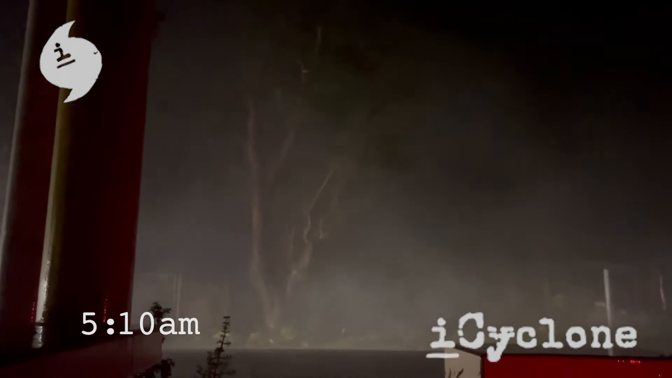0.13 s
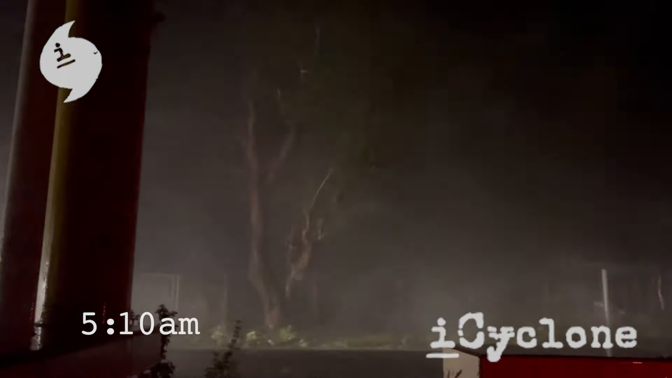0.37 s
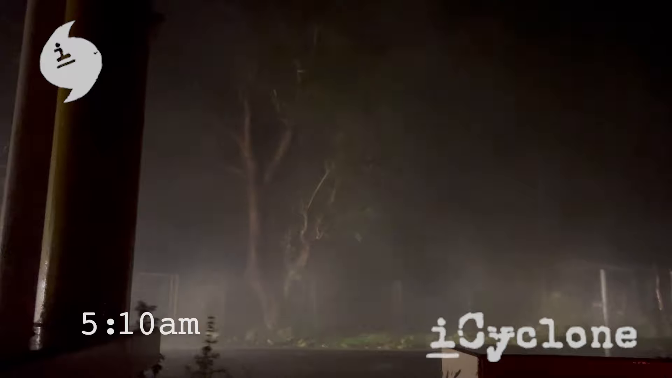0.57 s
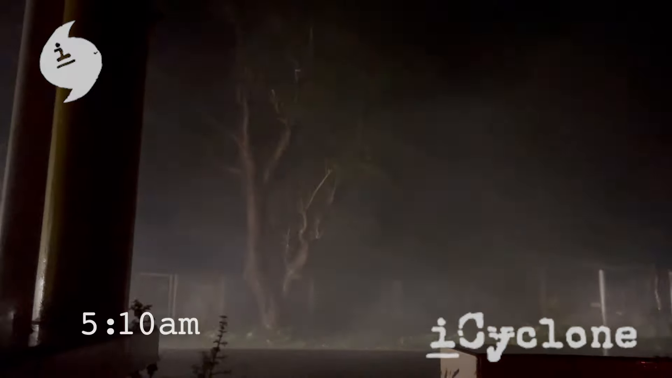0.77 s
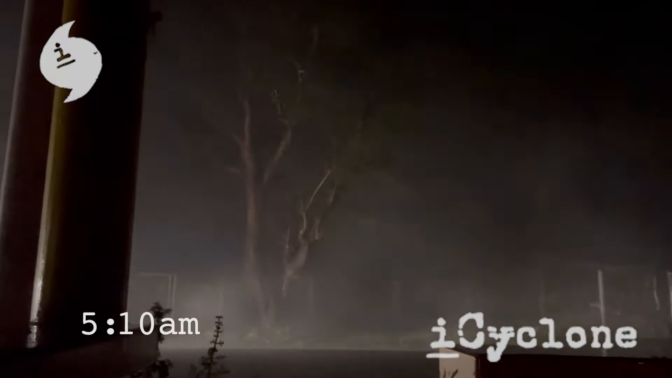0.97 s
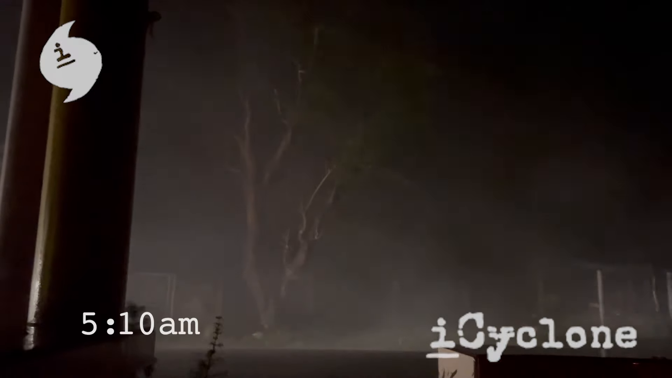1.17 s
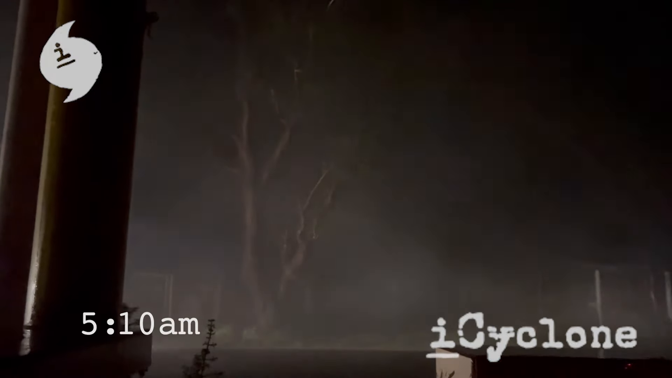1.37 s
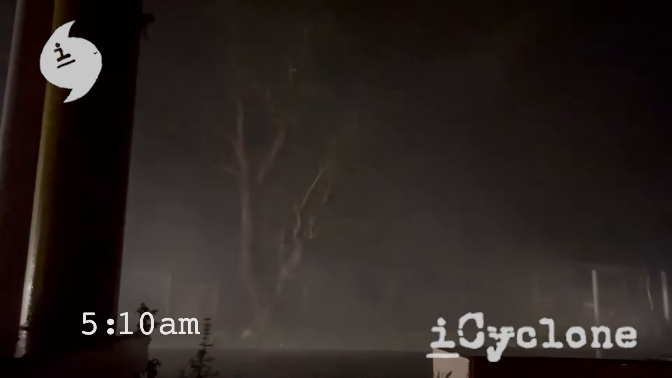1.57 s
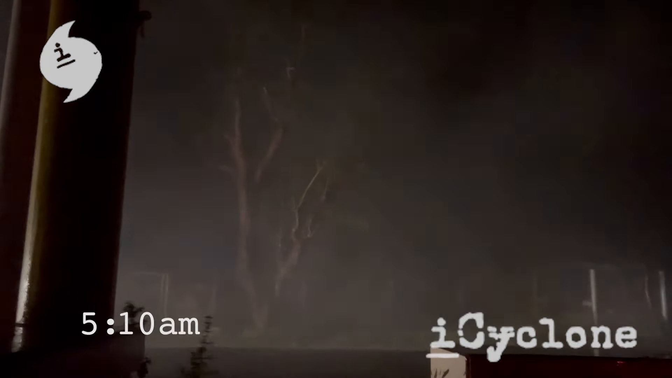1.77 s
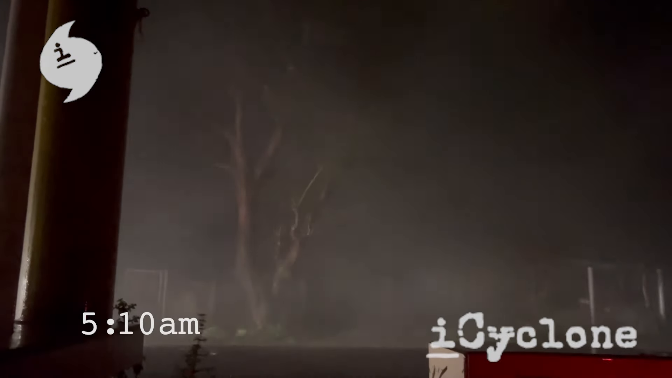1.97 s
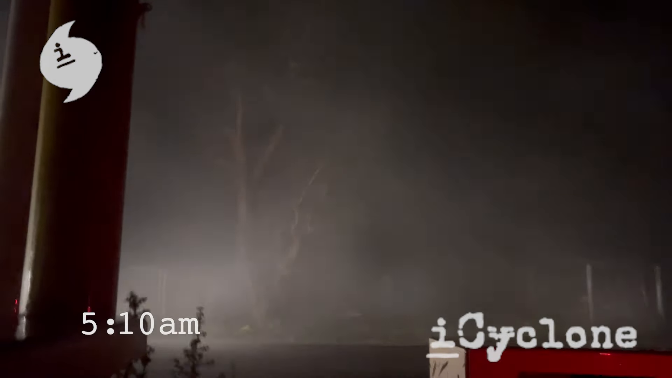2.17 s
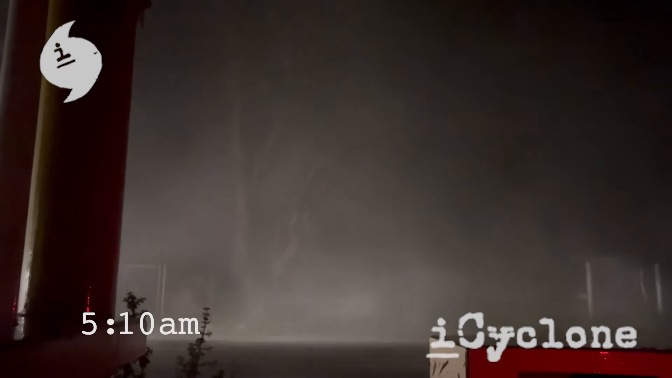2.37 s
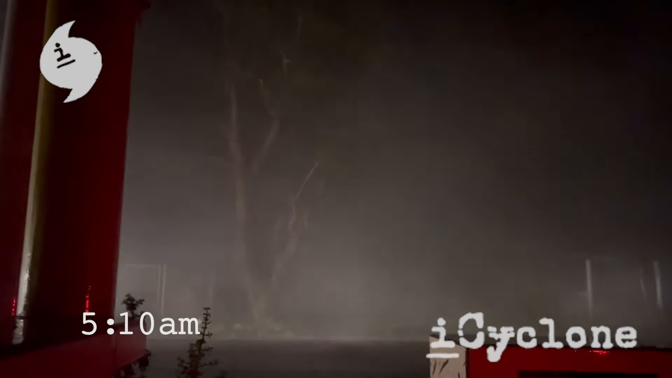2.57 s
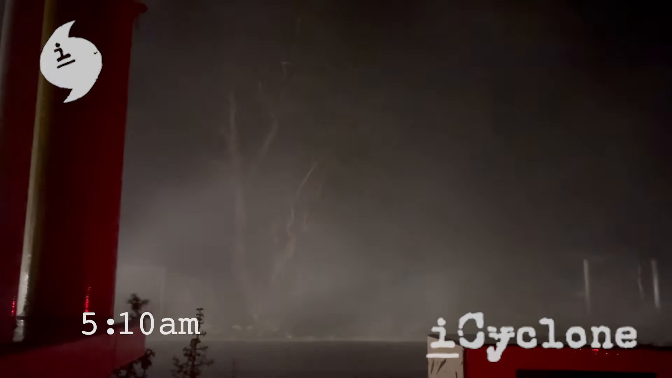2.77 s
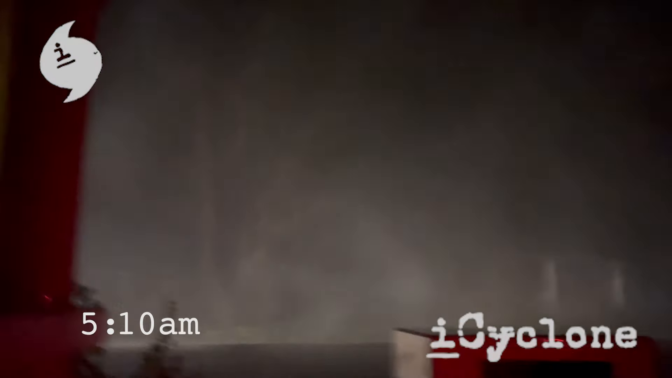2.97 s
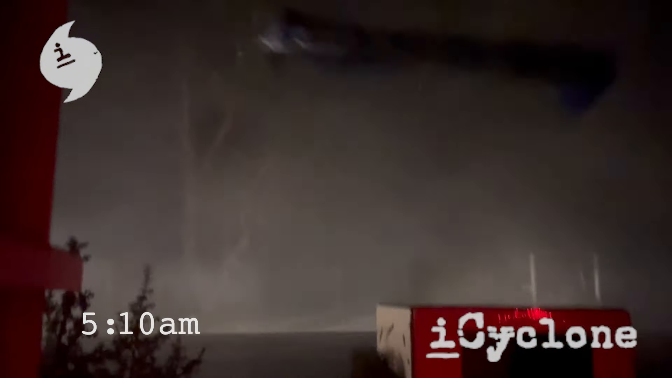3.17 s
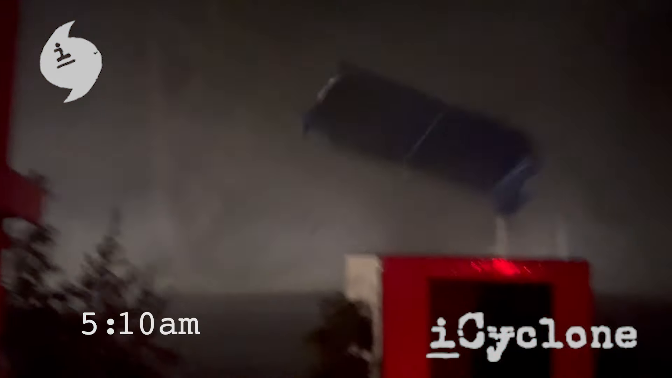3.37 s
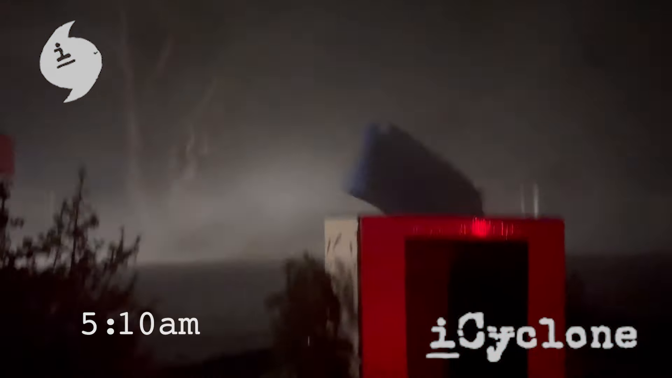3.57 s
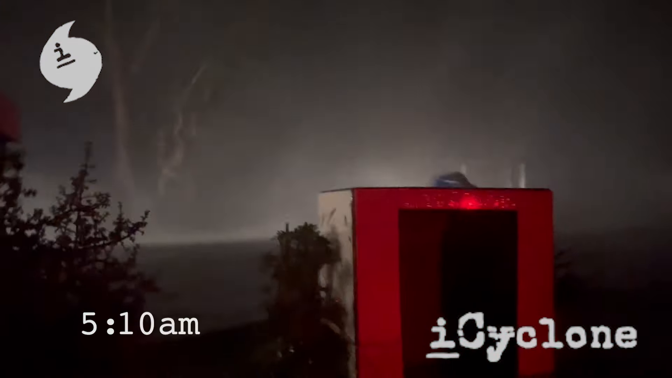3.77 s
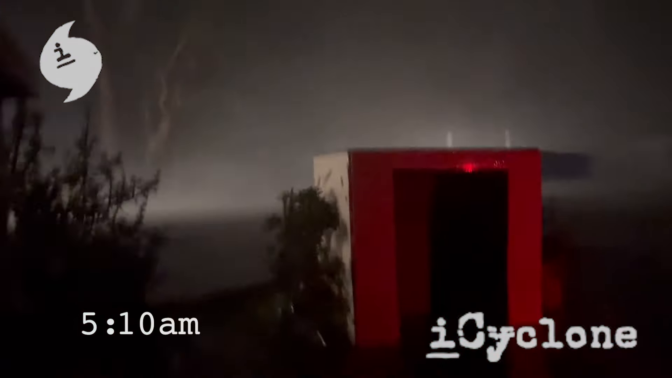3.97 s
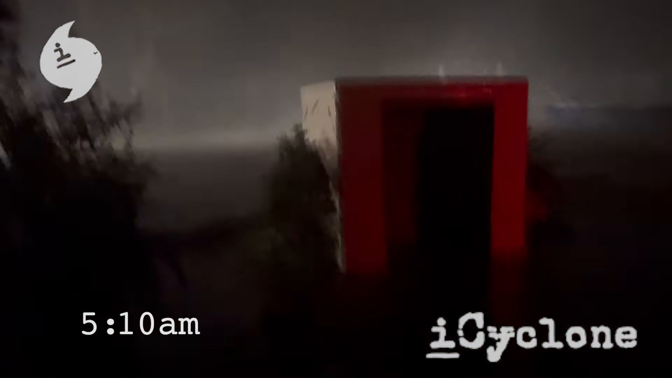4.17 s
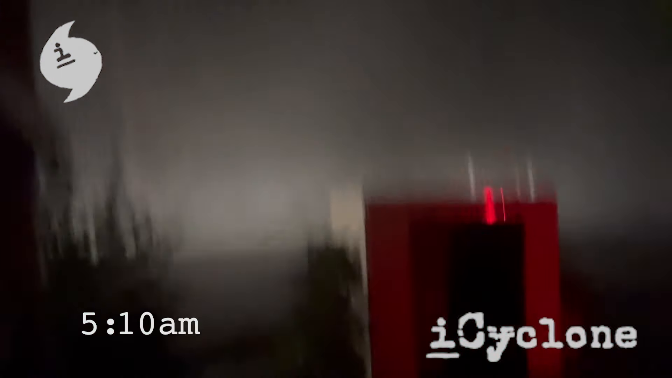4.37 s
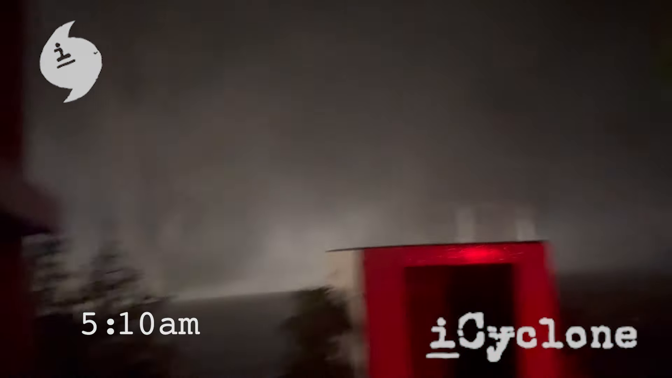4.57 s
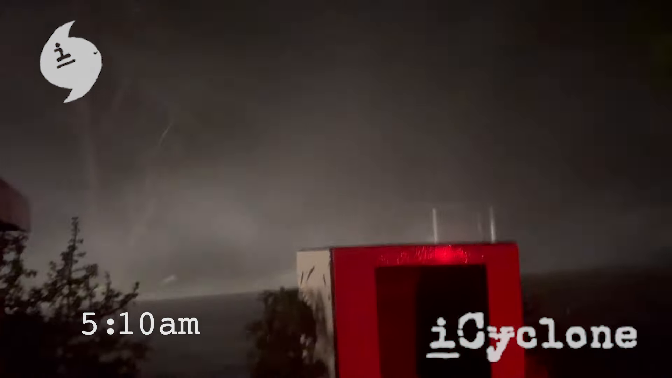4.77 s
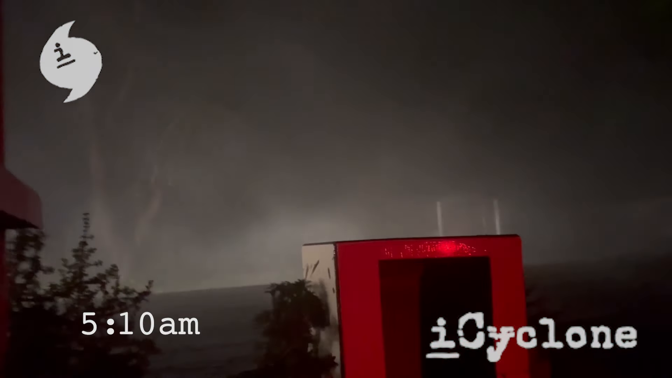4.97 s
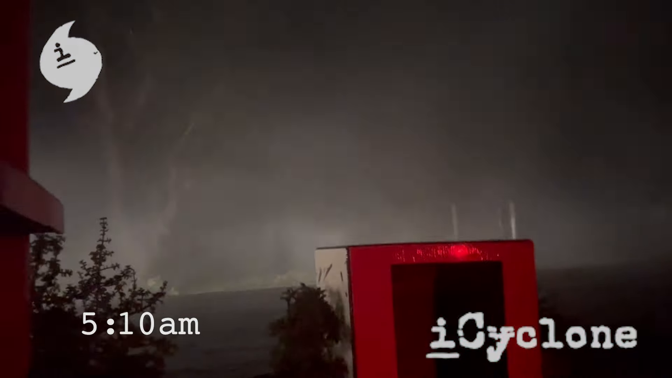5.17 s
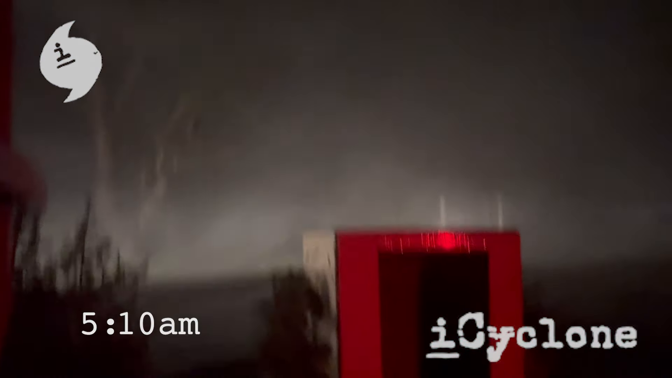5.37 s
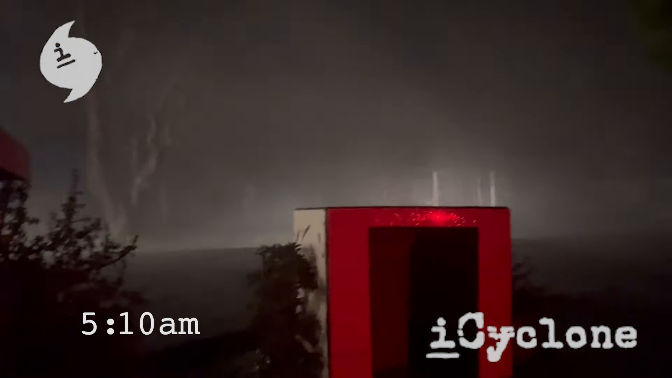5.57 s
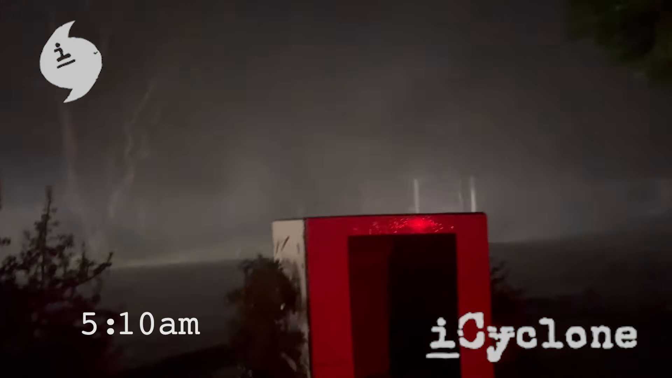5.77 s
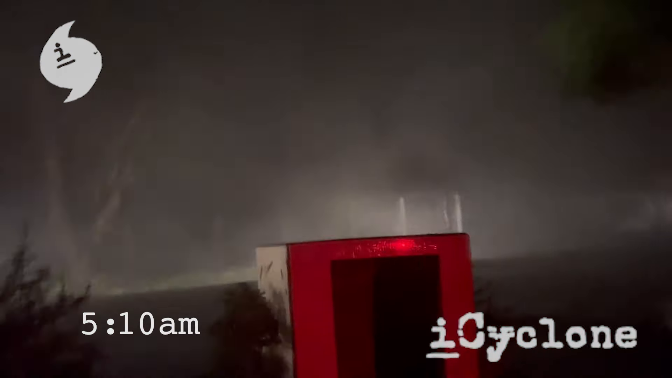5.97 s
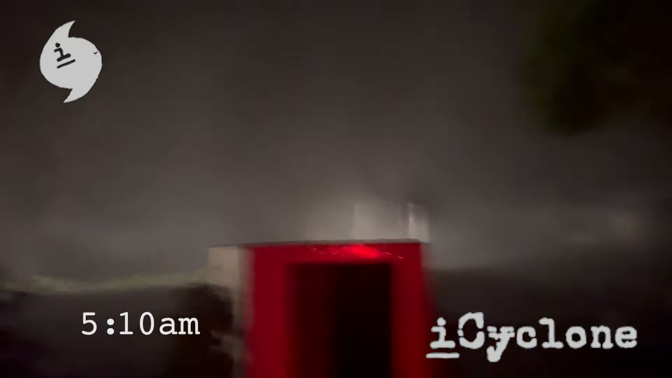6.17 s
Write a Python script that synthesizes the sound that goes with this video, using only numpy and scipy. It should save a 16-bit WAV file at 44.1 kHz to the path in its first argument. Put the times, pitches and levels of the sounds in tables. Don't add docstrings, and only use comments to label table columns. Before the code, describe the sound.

Heavy storm wind and rain rush past a sheltered doorway; sheet metal clatters and booms, one sharp tick strikes nearby, then the gale rolls on.

```python
import sys
import numpy as np
from scipy import signal
from scipy.fft import rfft, irfft
from scipy.io import wavfile
from scipy.ndimage import uniform_filter1d

SR = 44100
rng = np.random.default_rng(int(sys.argv[2]) if len(sys.argv) > 2 else 0)


def inscribe(sig):
    pcm = np.round(np.clip(np.atleast_2d(sig).T, -1, 1) * 32767)
    wavfile.write(sys.argv[1], SR, pcm.astype(np.int16))


def volts_from_db(level):
    exponent = np.asarray(level, float) / 20
    return 10 ** exponent


N = 275184
HZ = np.arange(N // 2 + 1) * SR / N
T = np.arange(N) / SR
SLOW = T[::48]


def storm():
    # start_s, wind_db, rain_db
    strength_points = [(.12, -27, -31.5), (.312, -29.5, -32), (.816, -26.5, -34), (1.1, -27.5, -31.5),
                       (1.39, -23.5, -33), (1.56, -28.5, -35.5), (2.24, -25.5, -35), (2.5, -29, -35.5),
                       (2.9, -26.5, -38.5), (3.15, -30.5, -37.5), (3.86, -34, -38), (4.0, -32, -40.5),
                       (4.5, -30.5, -40), (5.03, -30.5, -38.5), (5.36, -32.5, -37.5), (5.68, -32, -39.5),
                       (6.05, -32.5, -37), (6.24, -30, -35)]
    layer_hz = [70, 320, 1300, 5500]
    # wind_slope_db_per_db, rain_slope_db_per_db
    storm_slopes = [(-0.35, 0.9), (1.1, -0.05), (0.25, 0.56), (0.04, 0.83)]
    start_s, *strength_db = np.transpose(strength_points)
    changes_db = [np.interp(SLOW, start_s, level - np.mean(level)) for level in strength_db]
    layers_db = np.array(storm_slopes) @ changes_db
    air = doorway_air()
    octave = np.log2(np.maximum(HZ, 1))
    squall, sway = walk(rate=6.0), walk(rate=12.0)
    out = 0
    for centre in np.arange(13, 44) / 3:
        band = np.cos(np.clip(3 * (octave - centre), -1, 1) * np.pi / 2) ** 2
        weights = [on_log(2 ** centre, layer_hz, row) for row in np.eye(4)]
        gust_db = sum(weight * level for weight, level in zip(weights, layers_db))
        sway = 0.8 * sway + 0.6 * walk(rate=10.0)
        flicker = walk(rate=16.0)
        gain = volts_from_db(gust_db + 0.23 * squall + 0.41 * sway + 0.51 * flicker)
        out = out + fine(gain) * irfft(air * band, N)
    return out


def doorway_air():
    # pitch_hz, level_db (per Hz)
    air_colour = [(25, -66), (45, -55), (110, -58.5), (148, -60), (200, -58.5), (300, -54.5), (480, -57.5),
                  (620, -59), (1500, -59), (2600, -68.5), (6000, -73), (8500, -73), (10700, -75.5),
                  (12300, -83.5)]
    # pitch_hz, width_hz, lift_db
    hollow_modes = [(68, 20.7, 14), (115, 13, 4.5), (180, 19.4, 9), (224, 24, -3.5), (300, 265, 2.5),
                    (430, 12, 0)]
    wind = rfft(rng.standard_normal((2, N)))
    drops = rfft(grains(spread_db=2.5))
    share = np.clip(on_log(HZ, [1500, 9000], [0.05, 0.7]), 0, 1)
    mixture = np.sqrt(1 - share) * wind + np.sqrt(share) * drops
    open_air = mixture * volts_from_db(on_log(HZ, *np.transpose(air_colour))) * np.sqrt(SR / 2)
    lift = sum((volts_from_db(db) - 1) * np.abs(resonance(hz, width)) ** 2 for hz, width, db in hollow_modes)
    return open_air * (1 + lift)


def debris():
    sheet = sheet_blows() + sheet_notes()
    return sheet + volts_from_db(-10.0) * shape(sheet, wall_response())


def sheet_blows():
    # start_s, body_db, hardness_db, decay_s
    bangs = [(0.001, -1.5, -1.5, 0.25), (0.023, -7, 4, 0.28), (0.059, -10, 0, 0.15),
             (0.244, -11.5, -9, 0.28), (.77, -14, 2, .3), (1.04, -17.5, 4, .5), (1.664, -9, 4.5, 0.81),
             (1.704, -2.5, -5.5, 0.36), (1.739, -10.5, -1, 0.34), (1.789, -7, -18, 0.3),
             (1.824, -11, -4, 0.39), (1.861, -8.5, -4, 0.32), (1.911, -10.5, 0, 0.54),
             (1.945, -2, -1, 0.26), (1.989, -6, -13, 0.49), (2.029, -11, -3, 0.35), (2.074, -9, -4.5, 0.34),
             (2.134, -19.5, 12, 0.15), (2.408, -9, -1, 0.17), (2.83, -18, 3, 0.28),
             (3.566, -2.5, 1.5, 0.27), (3.584, -12, 8, 0.28), (3.614, -11, -13, 0.27),
             (3.709, -8.5, 4.5, 0.25), (3.744, -21, 11, 0.24), (3.789, -22, 8.5, 0.59),
             (4.2, -18, 3.5, 0.53), (4.3, -16.5, 1, .4), (4.342, -11.5, 2.5, 0.38)]
    # over_blow_db, slope_db_per_db of hardness, slowness_ratio
    sheet_parts = [(-24, 0.2, 1.4), (-8.5, 0, 0.94), (-13, 0.77, 1.26), (-18, 0.8, 1.19)]
    # pitch_hz, width_hz, level_db
    boom_modes = [(69, 4.7, -14.5), (102, 28, -5), (123.6, 7.3, 18)]
    body_modes = [(180, 21, -1), (237, 12.6, -2.5), (262, 19, -1), (326, 42, -2), (416, 55, -3.5),
                  (540, 75, -4.5), (667, 212, -6), (937, 150, -5)]
    clatter_modes = [(1148, 203, 10.5), (1626, 484, 8), (2144, 270, 6), (2670, 1140, 1)]
    hiss_modes = [(3650, 1600, 3), (5600, 2900, -1), (10700, 4800, -11)]
    power = np.zeros((4, N))
    for start_s, body_db, hardness_db, decay_s in bangs:
        for k, (over_db, slope, slow) in enumerate(sheet_parts):
            at, envelope = blow(start_s, 0.0038 * slow, decay_s * slow)
            power[k, at] += (volts_from_db(body_db + over_db + slope * hardness_db) * envelope) ** 2
    knocks = grains(spread_db=1.0)
    parts = zip(power, (boom_modes, body_modes, clatter_modes, hiss_modes))
    return sum(ring(np.sqrt(p) * knocks, modes) for p, modes in parts)


def sheet_notes():
    # start_s, pitch_hz, level_db
    struck_notes = [(0.013, 236, -14), (.02, 787, -11), (.012, 1040, -16), (.035, 1300, -9),
                    (0.229, 185, -8.5), (0.256, 300, -21), (1.72, 150, -11), (1.683, 178.4, -6),
                    (1.713, 108, -3), (1.812, 180, -5), (3.712, 200, -16), (2.23, 390, -16),
                    (2.39, 400, -18), (1.97, 300, -20), (1.989, 466, -9), (2.021, 220, -11.5),
                    (2.039, 189, -9.5), (2.586, 300, -12.5), (2.601, 240, -11.5), (3.566, 255, -4.5),
                    (3.569, 480, -6.5), (3.586, 94, -9), (3.618, 295, -12.5), (3.74, 326, -22),
                    (3.745, 280, -16), (4.338, 2350, -17), (4.345, 2640, -24), (4.353, 1536, -15),
                    (4.357, 983, -17), (3.59, 330, -13)]
    # start_s, pitch_hz, level_db
    free_notes = [
        (1.854, 120, -10),
        (1.92, 123, -13),
        (1.95, 189, -14),
        (2.0, 429.5, -17),
        (1.75, 808, -21),
        (6.08, 280, -23),
    ]
    # start_s, level_db
    thumps = [(.235, -13), (0.329, -25), (.97, -13), (1.744, -5), (1.94, -7), (2.059, -6), (2.261, -14),
              (2.4, -22), (2.601, -12), (3.575, -8), (3.693, -13), (4.1, -14), (4.19, -12.5), (4.29, -9.5),
              (4.831, -13), (5.004, -13), (5.38, -15), (5.7, -15), (6.08, -11.5)]
    thump_hz, free_ring = 68.9, 2.3
    paths = np.array([fine(walk(rate=35.0)), fine(walk(rate=30.0))])
    waver = 1 + 0.044 * fine(walk(rate=45.0)) + 0.012 * paths
    shake = fine(volts_from_db(1.85 * walk(rate=70.0)))
    notes = [(*note, 1) for note in struck_notes]
    notes += [(*note, free_ring) for note in free_notes]
    notes += [(start_s, thump_hz, db, 1) for start_s, db in thumps]
    out = np.zeros((2, N))
    for start_s, hz, db, longer in notes:
        swell_s = 0.026 * (thump_hz / hz) ** 0.61
        ring_s = longer * 0.22 * (thump_hz / hz) ** 0.32
        at, envelope = blow(start_s, swell_s, ring_s)
        tone = np.sin(2 * np.pi * hz * np.cumsum(waver[:, at], axis=1) / SR)
        out[:, at] += volts_from_db(db) * envelope * shake[at] * tone
    return out


def wall_response():
    tail = rng.standard_normal((2, N)) * 1000.0 ** (-T / 0.55) * (T > 0.02)
    return rfft(tail) / np.sqrt(np.sum(tail[0] ** 2)) / (1 + 1j * HZ / 3000)


def creaks():
    # start_s, length_s, from_hz, to_hz, level_db
    creak_events = [
        (.72, .06, 420, 420, -39),
        (1.115, .045, 470, 495, -27),
        (1.42, .042, 2600, 2590, -38),
        (1.47, .025, 2580, 2540, -42),
        (2.44, .06, 810, 800, -36),
        (2.83, .05, 980, 980, -39),
    ]
    out = np.zeros(N)
    waver = 1 + 0.0088 * fine(walk(rate=75.0))
    for start_s, length_s, from_hz, to_hz, db in creak_events:
        u = np.clip((T - start_s) / length_s, 0, 1)
        phase = 2 * np.pi * np.cumsum((from_hz + (to_hz - from_hz) * u) * waver) / SR
        out += volts_from_db(db) * np.sqrt(2 * np.sin(np.pi * u)) * np.sin(phase)
    return out * fine(volts_from_db(2.5 * walk(rate=72.0)))


def grit():
    # start_s, level_db
    grit_hits = [
        (3.311, -7),
    ]
    tick = np.zeros(N)
    for start_s, db in grit_hits:
        # lag_s, level_db
        for lag_s, echo_db in [(0, 4.5), (0.0009, -25), (0.003, -8), (0.008, -9), (0.014, -12)]:
            tick[int((start_s + lag_s) * SR)] += volts_from_db(db + echo_db)
    low_modes = 10.5 * resonance(2300, 560) - 7.5 * resonance(1500, 330)
    high_modes = -1.5 * resonance(4500, 3500) + 1.05 * resonance(10000, 9000)
    return shape(tick, low_modes + high_modes)


def blow(start_s, rise_s, decay_s):
    first = int(start_s * SR)
    at = slice(first, first + SR // 2)
    t = T[at] - T[at][0]
    swell = 1 - np.exp(-t / max(rise_s, 0.001))
    return at, swell * 1000.0 ** (-t / max(decay_s, 0.02))


def grains(spread_db):
    x = rng.standard_normal((2, N)) * volts_from_db(spread_db * rng.exponential(size=N))
    return x / np.std(x)


def resonance(hz, width):
    return 1j * HZ * width / (hz ** 2 - HZ ** 2 + 1j * HZ * width)


def ring(x, modes):
    gain = sum((-1) ** k * volts_from_db(db) * resonance(hz, width) for k, (hz, width, db) in enumerate(modes))
    return shape(x, gain / np.sqrt(np.mean(np.abs(gain) ** 2)))


def shape(x, gain):
    return irfft(rfft(x) * gain, N)


def walk(rate):
    k = int(len(SLOW) / T[-1] / rate)
    held = np.repeat(rng.standard_normal(len(SLOW) // k + 1), k)[:len(SLOW)]
    return 1.8 * uniform_filter1d(uniform_filter1d(held, k), k)


def fine(slow):
    return np.interp(T, SLOW, slow)


def on_log(hz, points, values):
    return np.interp(np.log(np.maximum(hz, 1)), np.log(points), values)


def scene():
    return storm() + debris() + creaks() + grit()


def band_limit(x):
    return signal.sosfilt(signal.butter(12, 17100, fs=SR, output="sos"), x)


def record(dry):
    # pitch_hz, coherence_0_to_1, left_minus_right_db, right_lead_rad
    port_response = [(60, .999, 0, 0.064), (129, 0.95, 0.5, -0.092), (280, 0.89, 0.5, -0.23),
                     (674, 0.22, 0, 0.34), (1690, 0.17, -0.5, 1), (2230, 0.36, -2, -0.62), (3040, 0, 4, -1),
                     (3980, 0.13, 4, -0.57), (5500, 0.35, 8.5, -0.72), (6060, 0.27, 11, -0.094),
                     (7240, 0.1, 6.5, -0.6), (8300, 0.8, 2, -0.28), (9550, 1, -0.5, -0.085),
                     (16000, 0.78, 1, 0.021)]
    hz, alike, lean_db, lead = np.transpose(port_response)
    alike = np.clip(on_log(HZ, hz, alike), 0, 1)
    lean = volts_from_db(on_log(HZ, hz, lean_db) / 2)
    lead = on_log(HZ, hz, lead) + 2 * np.pi * np.maximum(HZ - 8300, 0) / 3650
    one, other = rfft(dry)
    left = one * lean
    right = (alike * one + np.sqrt(1 - alike ** 2) * other) * np.exp(1j * lead) / lean
    top_hz = 15800
    ports = irfft(np.array([left, right]) * (HZ < top_hz), N)
    ports = np.tanh(ports / 1.54) * 1.462
    return band_limit(ports)


dry = scene()
out = record(dry)
inscribe(out)
```